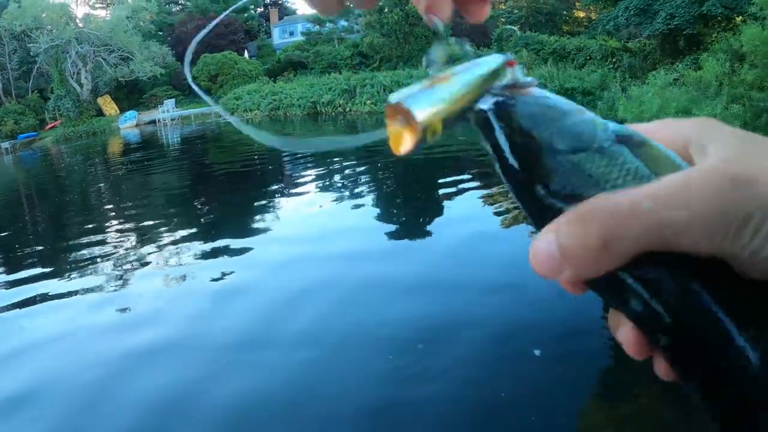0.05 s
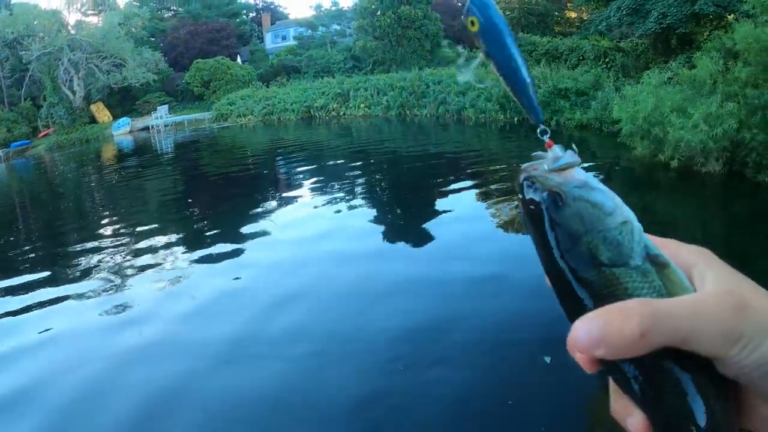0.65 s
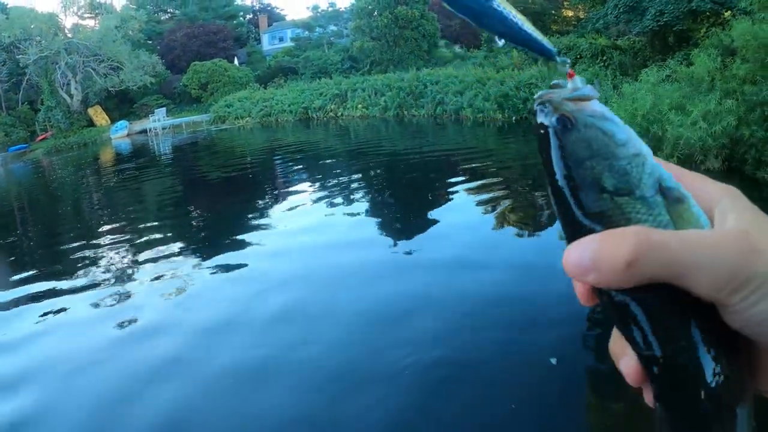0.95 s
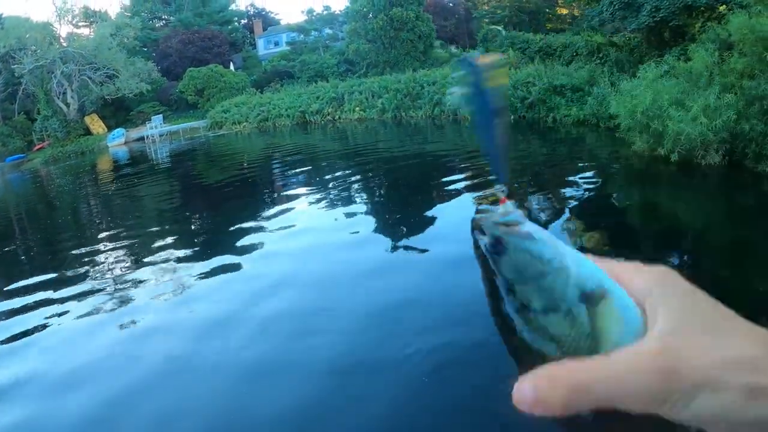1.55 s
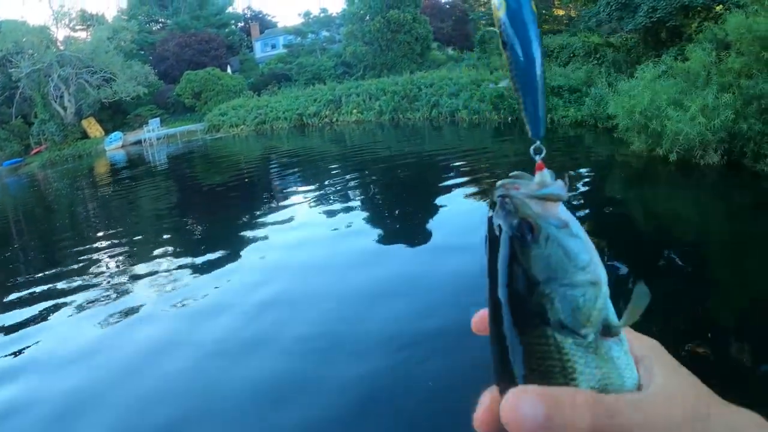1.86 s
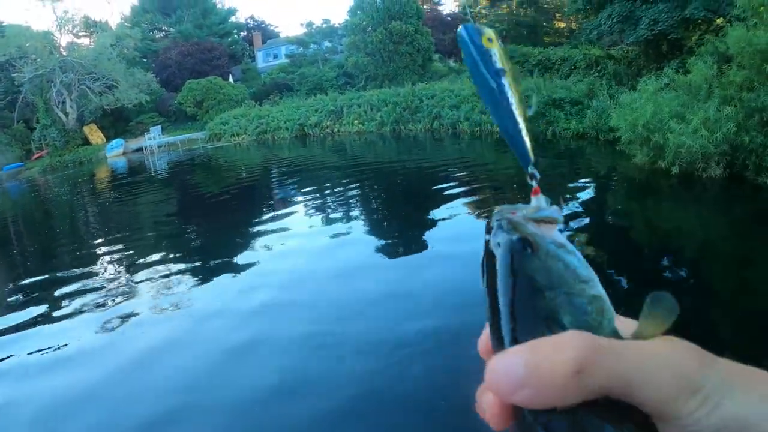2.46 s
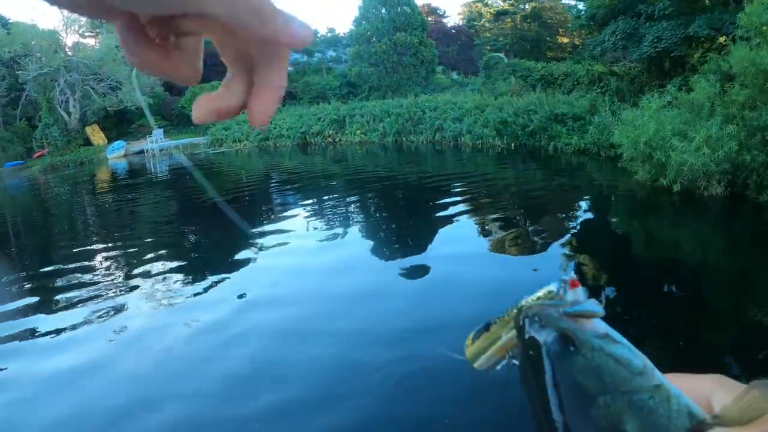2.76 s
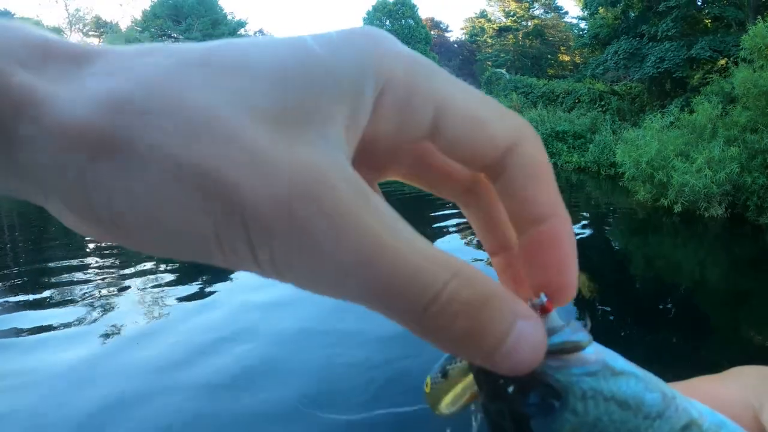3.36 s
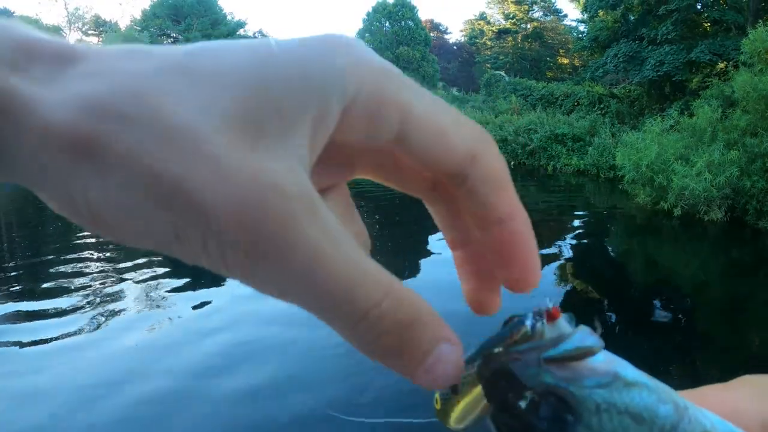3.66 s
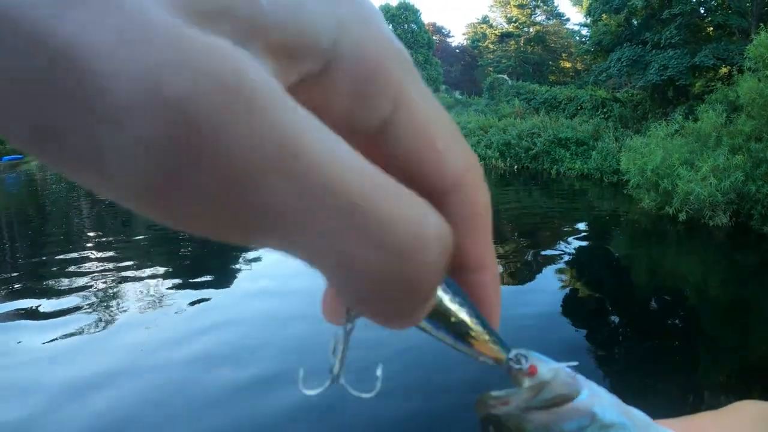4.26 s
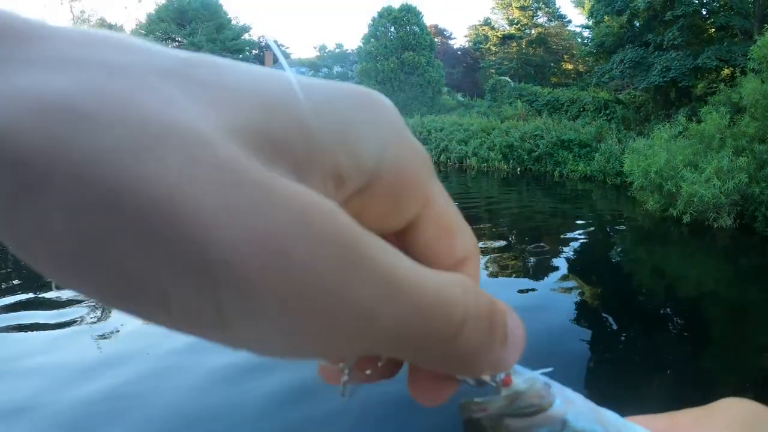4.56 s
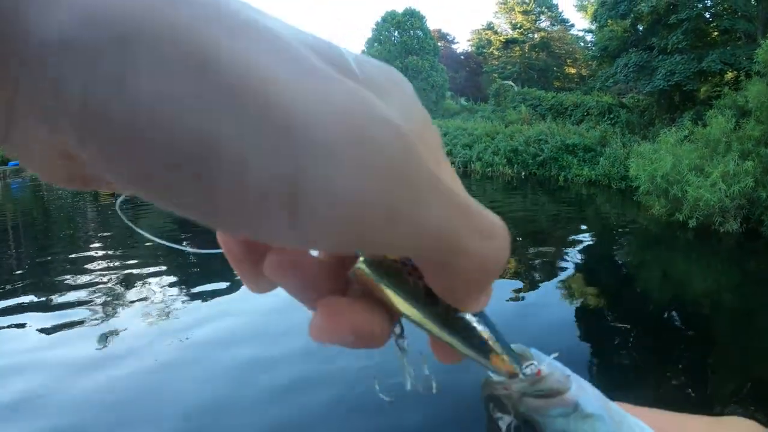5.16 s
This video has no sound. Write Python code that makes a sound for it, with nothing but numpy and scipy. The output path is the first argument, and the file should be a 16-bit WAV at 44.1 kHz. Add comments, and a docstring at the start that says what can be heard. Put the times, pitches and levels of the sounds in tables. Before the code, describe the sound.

Sleeves and wet hands rub against a caught fish while a dangling plastic lure and its hooks tick. Early on, the fish kicks once with a sharp knock and a low thump. The handling turns quieter, with faint wet squelches, then the hook crackles and clicks as fingers twist it. Everything is close to a body-worn microphone that rumbles with movement, against quiet air beside a pond.

```python
"""Beside a still pond, a freshly caught fish hangs from a plastic lure, heard from a chest-worn camera.
Sleeves and wet hands rub in tiny slips, hooks and lure tick, wet skin squelches, the fish kicks once
with a knock, and the hook cracks as fingers work it free. Every click rings the camera's small
cavities; body movement shakes it with a low rumble. Quiet air and a faint drone lie behind."""
import sys
import numpy as np
from scipy import signal
from scipy.fft import rfft, irfft
from scipy.io import wavfile
from scipy.ndimage import uniform_filter1d

SR = 44100
rng = np.random.default_rng(int(sys.argv[2]) if len(sys.argv) > 2 else 0)


def to_wav(s):
    """Save 16-bit WAV."""
    ch = np.atleast_2d(s).T  # columns
    pcm = np.round(np.clip(ch, -1, 1) * 32767)  # PCM
    wavfile.write(sys.argv[1], SR, pcm.astype(np.int16))


N = 238536
TIME = np.arange(N) / SR
FREQ = np.fft.rfftfreq(N, 1 / SR) + 1

# spectrum of a tick or slip: freq_hz, gain_db
CLICK_COLOUR = [(150, -15), (500, -15.5), (800, -13), (1100, -6.5), (2000, -3), (3600, 2), (4500, 1.5),
                (5300, -3), (8000, -3.5), (10500, -7), (13000, -7.5), (16500, -44)]
# camera cavities: freq_hz, width_hz, lift_db
CAVITY_MODES = [(6120, 150, 10), (6335, 405, 13), (9566, 116, 10.5), (11530, 1100, 2.5), (14650, 290, 22.5)]


def rubbing(base_rate_hz=280, scatter_db=4, tail_s=0.0012, patchy_db=9):
    """Sleeves and wet skin stick and slip: tiny uneven clicks that crowd as the rubbing gets harder."""
    # contact with the camera: time_s, ring_db, crowding_db
    contact = [(0.5, -7, -1), (0.8, -6, -1), (1.25, -6, -1.5), (1.35, -17, 3), (1.6, -8, 2),
               (1.9, -7.5, 1.5), (2.6, 4, -0.5), (3.2, -28, 5.5), (4.72, -8, -8.5), (4.76, -8, 2),
               (4.9, -15, -7.5)]
    level_db, treble_db = rub_force()
    ring_db, crowding_db = curves(contact)
    rate_hz = base_rate_hz * undb(0.71 * (level_db + 48.5) + crowding_db)
    size = undb(scatter_db * np.minimum(rng.exponential(size=N), 3.5))
    slips = (rng.random(N) < rate_hz / SR) * size
    tail_power = signal.lfilter([1], [1, -np.exp(-1 / (tail_s * SR))], slips ** 2)
    push = slips * rng.choice([-1, 1], N) + 0.085 * stereo_noise(N, apart=0.77) * np.sqrt(tail_power)
    spectrum = rfft(push)
    # the wandering contact catches now one cavity, now another
    for hz, width_hz, lift_db in CAVITY_MODES:
        catch = 0.94 * undb(lift_db + ring_db + patchy_db * np.tanh(wander(rate_hz=60)))
        spectrum += rfft(push * catch) * resonance(hz, width_hz)
    spectrum *= causal(undb(along(CLICK_COLOUR)))
    treble = irfft(spectrum * treble_share(FREQ), N)
    sound = irfft(spectrum, N) + (undb(treble_db - 1) - 1) * treble
    # hand pressure sets the power, however the slips fall
    power = np.mean(sound ** 2, axis=0)
    power = uniform_filter1d(uniform_filter1d(power, size=1500), size=1500)
    return sound / np.sqrt(np.abs(power) + 1e-4) * undb(level_db)


def rub_force(attack_s=0.0073, release_s=0.014):
    """Each rub grips, holds and lets go over the creep of the grip; returns level_db, treble_db."""
    # moves of hands or fish: start_s, hold_s, level_db, treble_db
    rubs = [(0.042, 0.018, -36, -5), (0.067, 0.056, -29, 9), (0.121, 0.049, -34.5, 12),
            (0.191, 0.11, -41, 1.5), (0.244, 0.045, -36.5, -6), (0.376, 0.024, -47, 9),
            (0.474, 0.11, -40, 0), (0.607, 0.071, -45.5, 5), (0.902, 0.05, -50, 10),
            (1.047, 0.047, -49.5, 10), (1.243, 0.11, -46.5, -10), (1.323, 0.067, -28.5, -7),
            (1.334, 0.091, -29, 6), (1.449, 0.023, -40.5, 0), (1.539, .25, -37.5, -1.5),
            (1.57, 0.19, -36, 0), (2.643, 0.049, -45.5, -9), (2.774, 0.071, -43, -4),
            (3.427, 0.015, -56.5, 4), (3.498, 0.074, -57.5, -12), (4.012, 0.036, -52.5, -6.5),
            (4.327, 0.012, -49.5, -3), (4.745, 0.032, -29, 3), (4.796, 0.056, -40, 0),
            (4.852, 0.019, -39.5, -11), (5.024, 0.039, -50, 6), (5.133, 0.086, -52, 13)]
    # creep between rubs: time_s, level_db, treble_db
    creep = [(0.0, -60.5, -4), (0.35, -48, -2), (0.7, -48.5, 4), (1.0, -56, 9), (1.5, -53, 4),
             (1.88, -46.5, 7.5), (2.1, -53.5, 3), (2.3, -56, 1), (2.55, -55, 7), (2.95, -51, 4),
             (3.15, -55.5, 6.5), (3.33, -64, -18), (4.1, -63, 4), (4.44, -88, 12), (4.5, -52, -1),
             (4.9, -48.5, 11), (5.28, -61.5, -4), (5.41, -60.5, 9)]
    creep_db, creep_treble_db = curves(creep)
    power = undb(creep_db) ** 2
    weighted_treble = power * creep_treble_db
    for start_s, hold_s, level_db, treble_db in rubs:
        before = np.maximum(start_s - TIME, 0) / attack_s
        after = np.maximum(TIME - start_s - hold_s, 0) / release_s
        rub_power = (undb(level_db) * np.exp(-np.minimum(before + after, 20))) ** 2
        power += rub_power
        weighted_treble += rub_power * treble_db
    return 10 * np.log10(power), weighted_treble / power


def lure_ticks():
    """The dangling plastic lure and its hooks tick together."""
    # contacts: start_s, relative_db, treble_db
    ticks = [(0.0444, -28, 29), (0.0721, -31.5, -11), (0.0797, -22, -28), (0.0945, -27, -13),
             (0.1037, -21, 1.5), (0.1087, -15.5, 21), (0.1176, -17.5, 12), (0.2063, -35, 4),
             (0.2294, -30.5, -19), (0.2515, -27.5, -14), (0.2664, -32.5, 8), (0.363, -32, -16.5),
             (0.3885, -32.5, 4), (0.4255, -35, -19), (0.4755, -32, -17), (0.4845, -27, 33),
             (0.5008, -24, 12), (0.5203, -29.5, 17), (0.5537, -31.5, 22), (0.5724, -36, -9),
             (0.6583, -31, 16), (0.6659, -27, 35), (0.7537, -28.5, 7), (0.7723, -32.5, -6), (0.818, -35, 1),
             (0.8802, -38.5, 14), (0.9005, -39, 4), (0.9317, -36, -2), (1.0903, -37, -14),
             (1.1437, -35, 9.5), (1.1525, -35.5, 12), (1.1672, -35, 14), (1.2149, -27, 23),
             (1.2408, -38, -18.5), (1.2526, -28, 12), (1.2912, -36.5, 16), (1.3477, -21, -5),
             (1.3574, -26.5, 9), (1.3819, -21.5, -5), (1.3908, -21.5, -30), (1.4025, -27.5, -20),
             (1.4231, -31, 28), (1.5736, -23, -14), (1.5874, -19, -13), (1.5958, -26.5, -9),
             (1.6099, -24.5, 12), (1.6224, -27, 4), (1.6306, -23, 2), (1.6417, -21, 25),
             (1.6577, -25.5, -0.5), (1.6683, -24, 16.5), (1.6762, -20, 21.5), (1.6821, -21.5, 18),
             (1.728, -22, 26), (1.7356, -23, 12), (1.7664, -29.5, 17), (1.797, -29.5, 12), (1.8422, -31, 6),
             (1.8513, -28.5, 4), (1.8784, -32.5, -4), (1.9546, -36, 25), (1.9716, -31, 5),
             (1.9919, -36.5, -1), (2.0566, -37, 2.5), (2.1286, -38.5, 1), (2.5629, -28, -2),
             (2.5876, -32, 4), (2.6465, -35, 8), (2.6831, -34.5, -14.5), (2.7737, -33.5, -29),
             (2.779, -40, -9), (2.7955, -33.5, -17), (2.8162, -34.5, -5), (2.882, -30.5, 5),
             (2.9837, -40, -3), (3.0431, -34, 3), (3.088, -43, 9), (3.1488, -40.5, -10), (3.5161, -44, -20),
             (3.5557, -41.5, 8), (3.6782, -43.5, -20), (3.7646, -44.5, -29), (4.3339, -38, -11)]
    return clicks(ticks, CLICK_COLOUR, chatter=0.57, chatter_s=0.00085, ring=1.1,
                  tilt_db=3.5, gain_db=-1.5, apart=0.32)


def hook_cracks():
    """The hook cracks as it twists in the mouth: much chatter, little ringing."""
    # twists: start_s, relative_db, treble_db
    cracks = [(4.4808, -21.5, 6), (4.4878, -33, -4), (4.5095, -27.5, 9), (4.5338, -25, 26),
              (4.5523, -28, 15), (4.5647, -29.5, 15), (4.5774, -29.5, -2), (4.5838, -34, 10),
              (4.6171, -22, 14.5), (4.6298, -27.5, 15), (4.6481, -32, 1.5), (4.6641, -38, 0),
              (4.6818, -37, -6.5), (4.7043, -29.5, 10), (4.7253, -32, 2), (4.7362, -29, 8),
              (4.7461, -25.5, -24), (4.7529, -25, -1), (4.7583, -17, 8), (4.7687, -21.5, -3.5),
              (4.8079, -28, 16), (4.8198, -23, 0), (4.8284, -38.5, -7), (4.8368, -31.5, 10),
              (4.8602, -30.5, -1.5), (4.8922, -40.5, -15), (4.9033, -41.5, -2.5), (4.9399, -40.5, -10.5),
              (4.9607, -32, -20), (4.9682, -37.5, -4), (5.0115, -40.5, -2), (5.1471, -35.5, 6),
              (5.171, -38, -9), (5.1868, -38, 1.5), (5.2258, -38.5, -5)]
    # crack spectrum: freq_hz, gain_db
    colour = [(150, -4), (600, -18.5), (1200, -14), (3400, -7.5), (5000, 2), (7500, 0), (9700, 1.5),
              (11600, -1), (13700, -9), (16500, -26)]
    return clicks(cracks, colour, chatter=1.7, chatter_s=0.0006, ring=0.11,
                  tilt_db=-3, gain_db=0, apart=0.25)


def clicks(contacts, colour, chatter, chatter_s, ring, tilt_db, gain_db, apart):
    """An impulse and brief chatter ring the cavities in random shares; harder contacts are brighter."""
    out, t = np.zeros((2, N)), TIME[:2048]
    freq = np.fft.rfftfreq(len(t), 1 / SR) + 1
    body = causal(undb(along(colour, freq)))
    for start_s, relative_db, treble_db in contacts:
        push = chatter * stereo_noise(len(t), apart) * np.exp(-t / chatter_s)
        push[:, 0] += 1
        modes = sum(rng.rayleigh() * undb(lift_db) * resonance(hz, width_hz, freq)
                    for hz, width_hz, lift_db in CAVITY_MODES)
        hardness = causal(undb((treble_db + tilt_db) * treble_share(freq)))
        click = irfft(rfft(push) * body * hardness * (1 + ring * modes))
        click /= np.sqrt(np.sum(click ** 2) / (2 * 0.003 * SR))  # energy of 3 ms at unit rms
        add(out, start_s, click * undb(relative_db + gain_db))
    return out


def knocks():
    """The fish's kick and softer bumps: heavily damped blows, barely one swing long."""
    # blows: centre_s, peak_db, pitch_hz, half_width_cycles, left_minus_right_db
    blows = [(1.3176, -6.5, 2080, 0.47, -4.5), (1.329, -22.5, 193, 0.2, 0), (1.357, -19, 34.5, 1, 1),
             (1.382, -19, 1160, 0.36, -5.5), (1.396, -25, 125, 0.58, -1), (1.479, -28.5, 197, 0.23, 2),
             (2.176, -28, 34.3, 0.85, 16), (3.163, -43, 570, 0.93, 4), (3.243, -46.5, 620, 0.77, 6),
             (3.706, -35, 40, 0.5, 25), (4.048, -29, 42, 0.44, 20), (5.02, -27.5, 72.6, 0.31, 15)]
    out = np.zeros((2, N))
    t = TIME[:8192] - TIME[4096]
    for centre_s, peak_db, hz, cycles, pan_db in blows:
        blow = -np.cos(2 * np.pi * hz * t) * np.exp(-(t * hz / cycles) ** 2)
        add(out, centre_s + t[0], blow * panned(peak_db, pan_db))
    return out


def squelches_and_pings(pop_rate_hz=330, sag=0.017, spread=0.03, damping=0.062, uneven_db=5):
    """Wet squelches near 2 kHz, plus two short, high pings of ticks ringing the camera's cavities."""
    # runs of uneven pops, each with a sagging resonance: centre_s, half_length_s, level_db, ring_hz
    runs = [(1.351, 0.0035, -29, 6160), (1.355, 0.0044, -25, 2140), (1.609, 0.002, -18.5, 6400),
            (2.808, 0.014, -41, 2270), (2.854, 0.016, -43, 2210), (2.891, .03, -49, 2170),
            (2.965, 0.013, -50, 2170), (3.493, 0.0054, -42, 1990), (3.506, 0.017, -47, 2050),
            (3.764, 0.0052, -44, 2160), (3.876, 0.0085, -52, 1760), (3.894, 0.021, -53.5, 2430),
            (4, 0.0089, -50, 2050), (4.055, 0.011, -52.5, 2200), (5.372, 0.036, -59, 1930)]
    out, t = np.zeros(N), TIME[:2048]
    for centre_s, half_s, level_db, ring_hz in runs:
        count = 1 + int(2 * half_s * pop_rate_hz)
        for k, (late, detune, force) in enumerate(rng.random((count, 3))):
            place = 2 * (k + late) / count - 1  # -1 to 1 through the run
            hz = ring_hz * (1 - sag * place + spread * (2 * detune - 1))
            volume = np.sin(2 * np.pi * hz * t) * np.exp(-np.pi * damping * ring_hz * t)
            pop = np.diff(volume)  # only the change of volume radiates: no bass
            pop[0] += 0.22  # snap at the onset
            pop /= np.sqrt(count * np.sum(pop ** 2) / (half_s * SR))
            size = undb(level_db + uneven_db * (2 * force - 1)) * (1 - place ** 2 / 2)
            add(out, centre_s + place * half_s, pop * size)
    return out


def brushing(grain_db=3):
    """The hand brushes over the fish: a soft, grainy swish."""
    # stroke: time_s, level_db
    stroke = [(2.5, -93), (2.7, -58), (3.1, -63.5), (3.2, -52), (3.4, -57.5), (3.7, -63), (4.0, -68),
              (4.15, -93)]
    # swish spectrum: freq_hz, gain_db
    colour = [(150, -1.5), (300, -8.5), (620, -15.5), (850, -19.5), (1500, -14), (2600, -16.5), (5000, -26),
              (7000, -48), (16000, -41.5)]
    return noise(colour) * undb(curves(stroke)[0] + grain_db * wander(rate_hz=180))


def rumble(tremble_db=-55.5, gain_db=-1):
    """The camera trembles on its strap and swings with each lurch; both ports move mostly alike."""
    # shake spectrum: freq_hz, gain_db
    colour = [(12, -15), (22, -2.5), (32, -1.5), (50, -8.5), (72, -8), (110, -15), (200, -30.5), (300, -40),
              (600, -60.5), (1500, -81)]
    # body lurches: centre_s, half_width_s, relative_db, left_minus_right_db
    lurches = [(0.09, 0.05, -35, -3.5), (0.618, 0.055, -45, -0.5), (1.362, 0.054, -20.5, -4.5),
               (1.578, 0.049, -38.5, 1), (1.896, 0.044, -44.5, 17), (1.988, 0.096, -38.5, 6),
               (2.206, 0.14, -37, 6.5), (2.775, 0.25, -44, 4), (3.695, 0.14, -46.5, 8),
               (3.957, 0.088, -39, 18), (4.074, 0.13, -41, 5), (4.258, 0.077, -41, -8),
               (4.6, 0.28, -41, 7.5), (4.776, 0.042, -31, -2), (4.936, 0.18, -39.5, 6)]
    shake = wide_noise(colour, apart=0.44)
    shake /= np.sqrt(uniform_filter1d(shake ** 2, size=4000) + 1e-6)
    power = undb(tremble_db) ** 2
    for centre_s, half_s, relative_db, pan_db in lurches:
        swing = np.exp(-np.minimum(2 * ((TIME - centre_s) / half_s) ** 2, 20))
        power = power + (swing * panned(relative_db, pan_db)) ** 2
    return shake * np.sqrt(power) * undb(gain_db)


def swells(relative_width=0.16):
    """A thin hiss comes and goes; a low drone grows in the distance."""
    # noise bands: centre_s, half_width_s, level_db, centre_hz
    bands = [(4.4, 0.15, -65.5, 7200), (5.08, 0.055, -57, 7100), (4.94, 4.6, -61, 206.7)]
    out = np.zeros(N)
    for centre_s, half_s, level_db, hz in bands:
        spectrum = rfft(rng.standard_normal(N)) * resonance(hz, relative_width * hz) ** 2
        envelope = undb(level_db) * np.exp(-2 * ((TIME - centre_s) / half_s) ** 2)
        out += unit_rms(irfft(spectrum, N)) * envelope
    return out


def pond_air(gain_db=-57, drift_db=0.6, lull_db=-6, lull_s=4.28, lull_half_s=0.26):
    """Quiet air and microphone hiss drift a little; the middle range hushes once."""
    # background spectrum: freq_hz, gain_db
    colour = [(20, 9.5), (120, 2), (220, -0.5), (300, -8), (420, -16), (750, -21.5), (1050, -15.5),
              (1500, -18.5), (3700, -20), (5100, -14), (6200, -21.5), (9000, -30), (16000, -47)]
    hiss = wide_noise(colour, apart=0.95)
    middle = irfft(rfft(hiss) * np.abs(resonance(hz=3060, width_hz=2900)) ** 2, N)
    hush = undb(lull_db * np.exp(-((TIME - lull_s) / lull_half_s) ** 2))
    return (hiss + (hush - 1) * middle) * undb(gain_db + drift_db * wander(rate_hz=3.01))


def ports(sound):
    """Sound reaches the right microphone port first and mostly louder."""
    # phase between ports: freq_hz, left_lead_rad
    phase = [(100, -0.5), (2000, -0.86), (4300, -1.03), (5500, -2), (6400, -2), (7400, -2), (9400, -1.44),
             (10500, -2.5), (11400, -2.12), (13000, -2), (15000, -1.5)]
    # balance between ports: freq_hz, left_minus_right_db
    balance = [(400, 0), (2300, -2.5), (4400, 1), (6300, -6), (9500, -2.5), (12000, -7)]
    left = undb(along(balance)) * np.exp(1j * along(phase))
    response = np.array([left, np.ones(len(left))]) * np.sqrt(2 / (1 + np.abs(left) ** 2))
    return irfft(rfft(sound) * response, N)


def undb(db):
    """Decibels to gain."""
    return 10 ** (np.asarray(db) / 20)


def panned(level_db, pan_db):
    """Left and right gains, pan_db apart."""
    return undb([[level_db + pan_db / 2], [level_db - pan_db / 2]])


def unit_rms(x):
    """Scale to an rms of one."""
    return x / np.sqrt(np.mean(x ** 2) + 1e-20)


def curves(table):
    """Columns of a time table, one value a sample."""
    time_s, *columns = np.transpose(table)
    return [np.interp(TIME, time_s, column) for column in columns]


def along(points, freq=FREQ):
    """Interpolate (freq_hz, value) points on a log-frequency axis."""
    hz, value = np.transpose(points)
    return np.interp(np.log(freq), np.log(hz), value)


def noise(colour):
    """Coloured noise at unit rms."""
    return unit_rms(irfft(rfft(rng.standard_normal(N)) * undb(along(colour)), N))


def wide_noise(colour, apart):
    """Coloured noise shared by both ports, plus a part of their own."""
    return noise(colour) + apart * np.array([noise(colour), noise(colour)])


def stereo_noise(count, apart):
    """Unit-variance white noise, partly shared by the two ports."""
    shared, *own = rng.standard_normal((3, count))
    return (shared + apart * np.array(own)) / np.sqrt(1 + apart ** 2)


def wander(rate_hz):
    """Random drift with a spread near one."""
    steps = rng.standard_normal(4096)
    return np.interp(TIME * rate_hz, np.arange(len(steps)), steps)


def resonance(hz, width_hz, freq=FREQ):
    """One damped mode, gain one at its centre."""
    return 1 / (1 + 1j * (freq ** 2 - hz ** 2) / (freq * width_hz))


def causal(gain):
    """Minimum-phase response: starts sharply, then rings out."""
    cepstrum = irfft(np.log(gain))
    half = len(cepstrum) // 2
    cepstrum[1:half] *= 2
    cepstrum[half + 1:] = 0
    return np.exp(rfft(cepstrum))


def treble_share(freq, split_hz=7000, top_hz=14000):
    """Weight, 0 to 1, of the band that hard contacts brighten."""
    return 1 / (1 + (split_hz / freq) ** 6) / (1 + (freq / top_hz) ** 10)


def add(out, start_s, sound):
    """Mix a short sound in at start_s."""
    start = max(int(start_s * SR), 0)
    part = out[..., start:start + sound.shape[-1]]
    part += sound[..., :part.shape[-1]]


def scene():
    """Close handling over the rumble and the quiet pond."""
    handling = lure_ticks() + hook_cracks() + rubbing() + squelches_and_pings() + brushing()
    return ports(handling + swells()) + knocks() + rumble() + pond_air()


def record(dry):
    """The camera cuts the treble above 16 kHz."""
    return signal.sosfilt(signal.ellip(8, 0.2, 70, 16000, fs=SR, output="sos"), dry)


dry = scene()
out = record(dry)
to_wav(out)
```